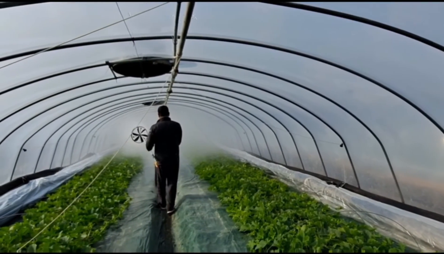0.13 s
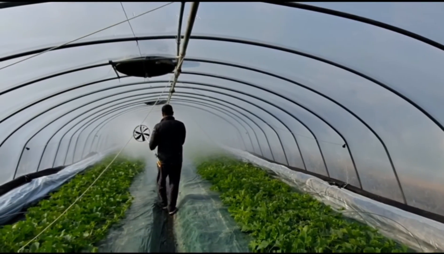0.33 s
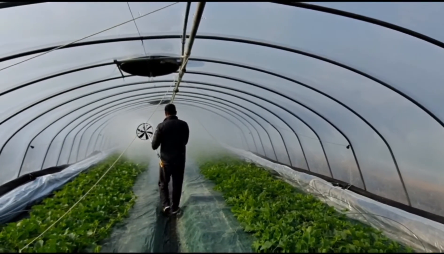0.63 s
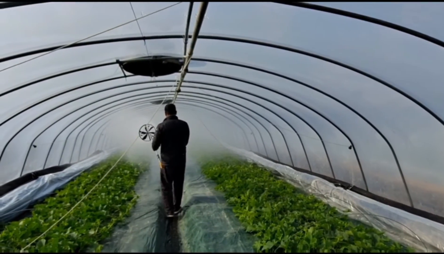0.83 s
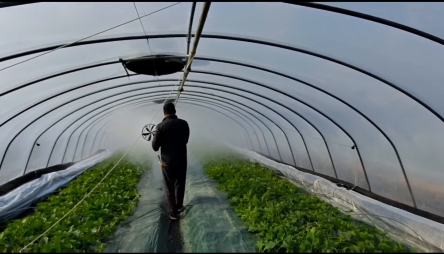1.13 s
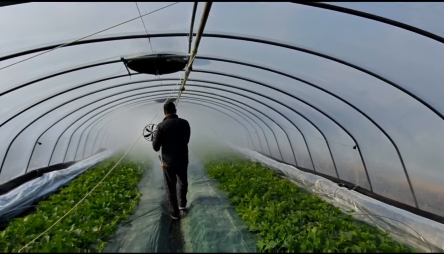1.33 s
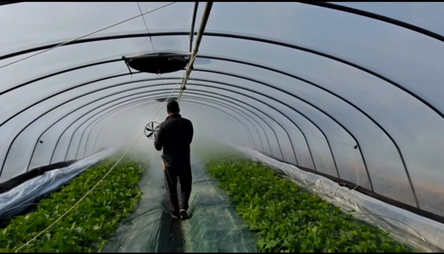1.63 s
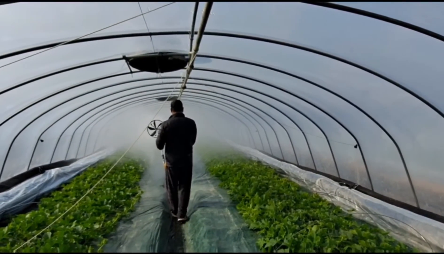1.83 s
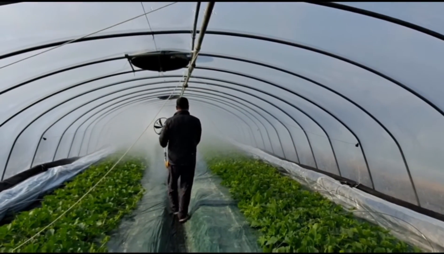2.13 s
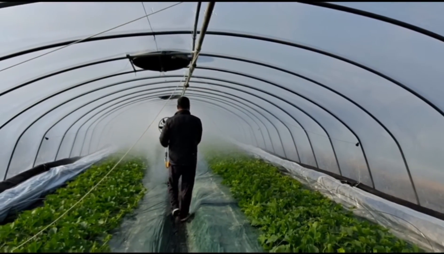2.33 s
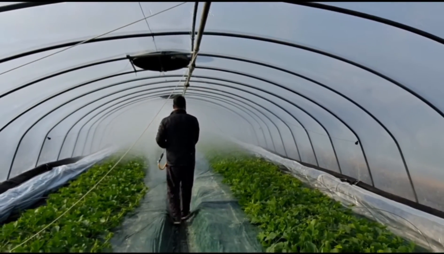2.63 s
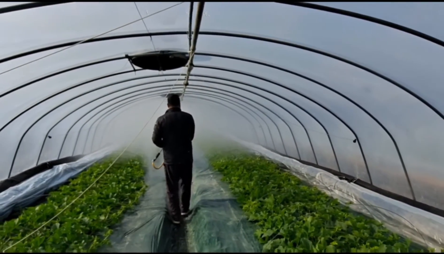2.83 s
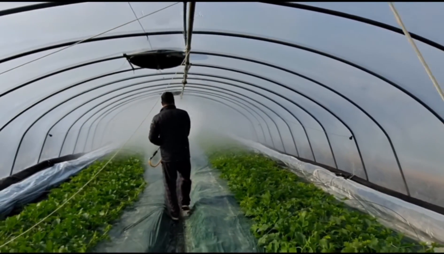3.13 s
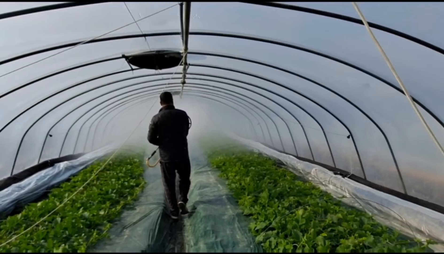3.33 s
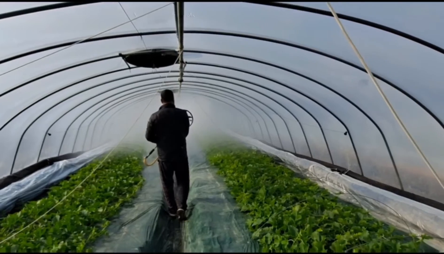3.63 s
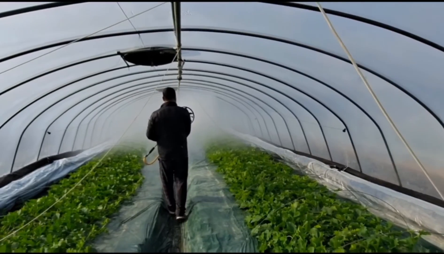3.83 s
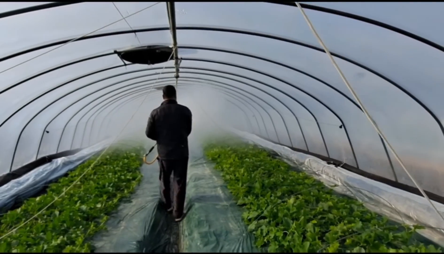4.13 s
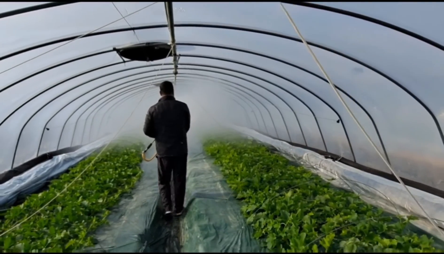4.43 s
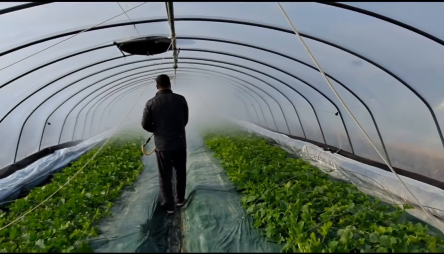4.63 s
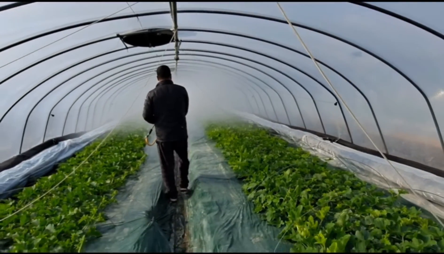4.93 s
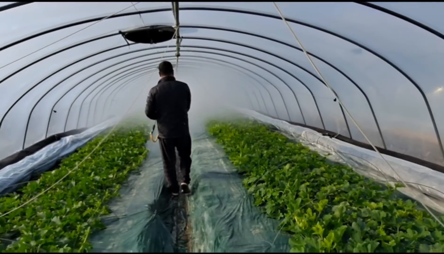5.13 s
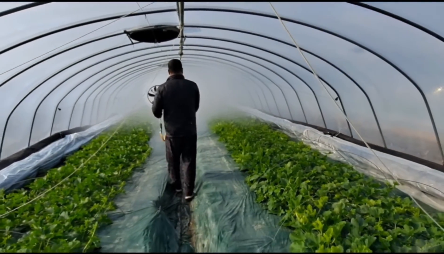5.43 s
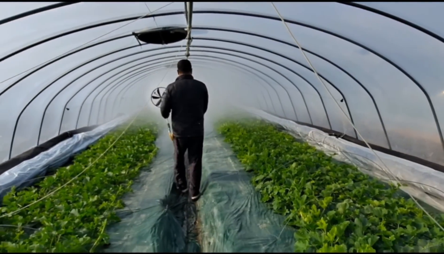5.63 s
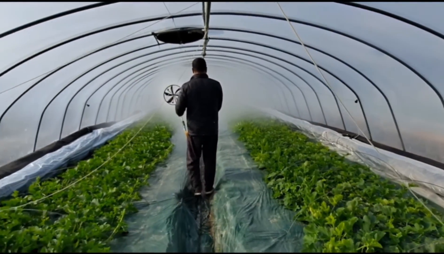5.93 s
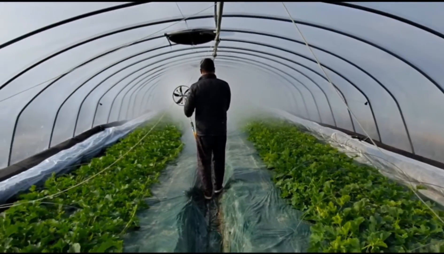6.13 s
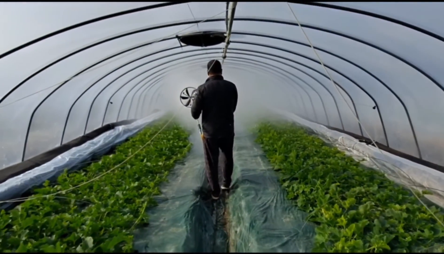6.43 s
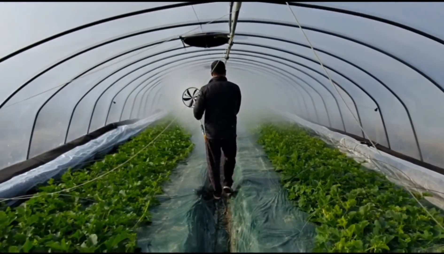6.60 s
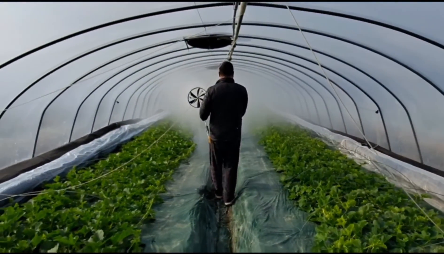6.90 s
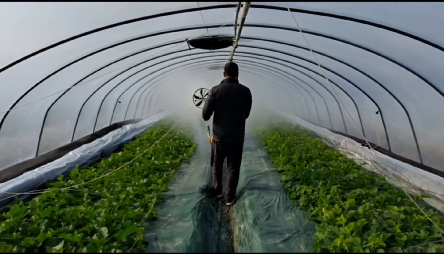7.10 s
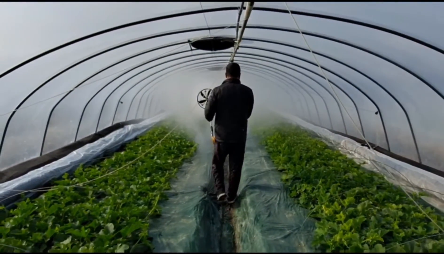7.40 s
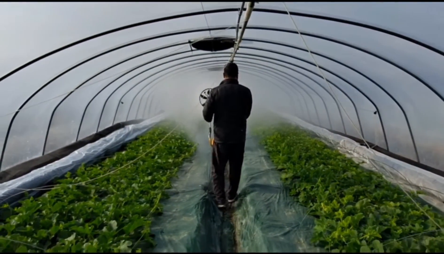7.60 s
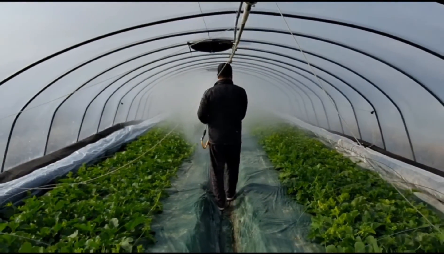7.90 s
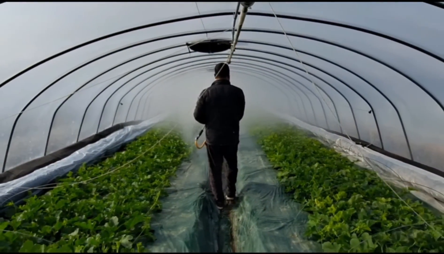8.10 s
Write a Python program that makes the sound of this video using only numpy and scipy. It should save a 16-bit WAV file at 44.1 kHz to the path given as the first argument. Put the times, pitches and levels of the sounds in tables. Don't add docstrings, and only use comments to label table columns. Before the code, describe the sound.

From 0 seconds a misting nozzle is already running, a few metres ahead of a single microphone in a plastic tunnel greenhouse. Its sound is a dense, bright, steady hiss, strongest in the high treble, with no separate drops or splashes. Far below it in level lies a soft, windy fan roar with a breathy, blurred low hum. The hiss wavers only slightly as the nozzle swings, dipping around 2 seconds, while the fan slowly grows nearer. At about 3.8 seconds everything jumps abruptly louder, the hiss most clearly, and stays there. Small dips follow near 4.3 and 7.4 seconds, with slightly brighter moments near 5.6 and at the end. Echoes from ground and film give a faint, shifting hollowness, and brief grainy flickers touch narrow bands. The spray continues to about 8.3 seconds without stopping.

```python
import sys
import numpy as np
from scipy import signal
from scipy.fft import rfft, irfft, next_fast_len
from scipy.io import wavfile

SR = 44100
rng = np.random.default_rng(int(sys.argv[2]) if len(sys.argv) > 2 else 0)


def gain_from_decibels(decibels):
    exponent = np.asarray(decibels, float) / 20
    return 10 ** exponent


def store_wav(level_fs):
    pcm = np.round(np.clip(np.atleast_2d(level_fs), -1, 1) * 32767)
    wavfile.write(sys.argv[1], SR, pcm.T.astype(np.int16))


N = 364266

# f/Hz, level/dB per Hz
JET_SPECTRUM = [(1800, -34), (2600, -18), (3200, -14.5), (3900, -9.7), (5400, -7.2), (6400, -7.3),
                (7600, -3.8), (8700, -4.2), (9700, -7.7), (10600, -5.4), (11900, -1.1), (13000, -1.1),
                (14200, -2.0), (15740, -3.2)]
# level/dB, gain step/dB
HISS_LEVEL = (-29.5, 3.98)


def nozzle_hiss():
    level_db, step_db = HISS_LEVEL
    hiss_db = level_db + step_db * gain_step() + nozzle_aim_db()
    return gain_from_decibels(hiss_db) * turbulence(JET_SPECTRUM, shared_db=0.26, near_db=0.39, own_db=0.23, rate=12.4)


# t/s, hiss level/dB about the mean
NOZZLE_AIM = [(0, 0), (.3, -.4), (.85, .5), (1.5, 0.06), (1.9, -.5), (2.3, -.5), (2.7, 0), (3.8, 0.3),
              (3.9, -0.4), (4.3, -0.54), (4.8, .2), (5.6, .5), (6.4, 0.17), (6.9, 0), (7.4, -.5), (7.8, 0),
              (8.26, .5)]


def nozzle_aim_db():
    aim_db, = in_time(NOZZLE_AIM)
    return aim_db


# f/Hz, level/dB per Hz
UPPER_ROAR = [(900, -27), (1250, -7), (1600, -4), (2200, -3.5), (2800, -3), (3400, -4), (4500, -31)]
LOWER_ROAR = [(380, -27), (520, -8.5), (700, -0.5), (810, -3.5), (950, -2), (1200, -4.5), (1700, -42)]
BODY_ROAR = [(110, -33), (170, -5), (240, 0.5), (265, -3), (330, 0.5), (450, -4.5), (700, -23.5)]


def fan_roar(upper_db, lower_db, body_db):
    roar = gain_from_decibels(upper_db) * turbulence(UPPER_ROAR, shared_db=0.3, near_db=0.8, own_db=0.5, rate=6.7)
    roar += gain_from_decibels(lower_db) * turbulence(LOWER_ROAR, shared_db=0.0, near_db=0.6, own_db=0.8, rate=4.6)
    roar += gain_from_decibels(body_db) * turbulence(BODY_ROAR, shared_db=0.15, near_db=0.44, own_db=1.8, rate=4.8)
    return roar


# f/Hz, level/dB per Hz
RUMBLE_SPECTRUM = [(10, -32), (28, -18), (40, -7.5), (62, 2), (85, -1.5), (130, 2), (170, -3.5), (260, -36)]


def fan_rumble(rumble_db):
    hum_db = -5.5
    rumble = turbulence(RUMBLE_SPECTRUM, shared_db=2.1, near_db=1.0, own_db=0.1, rate=5.8)
    return gain_from_decibels(rumble_db) * (rumble + gain_from_decibels(hum_db) * blade_hum())


def blade_hum():
    blade_hz, width_hz = 131.2, 26
    poles = resonance(blade_hz, width_hz)[0]
    once = signal.lfilter([1, 0, -1], poles, rng.standard_normal(N))
    return rms_one(signal.lfilter([1], poles, once))


# level/dB, gain step/dB, share of nearness, share of aim
FAN_LEVELS = [
    (-50.5, 4, 0.54, 1.5),
    (-58, 2.1, .8, -2.1),
    (-59.5, 2, 1.5, 0.5),
    (-61, 1.6, 0.86, -0.3),
]


def fan_layer_levels():
    stepped, near_db, aim_db = gain_step(), fan_nearness_db(), nozzle_aim_db()
    return [level_db + step_db * stepped + near_share * near_db + aim_share * aim_db
            for level_db, step_db, near_share, aim_share in FAN_LEVELS]


# t/s, fan level/dB
NEARNESS = [
    (0, -3.5),
    (1.5, -1.6),
    (3.0, -0.3),
    (3.8, 1),
    (5.5, .8),
    (8.26, 2),
]


def fan_nearness_db():
    near_db, = in_time(NEARNESS)
    return near_db


# t/s, shift (about -1..2)
SWING = [(0, 2), (1.1, .8), (1.85, 0.28), (2.0, -0.8), (3.2, -0.28), (4.8, -1.1), (5.2, 0.67), (5.7, 0.51),
         (6.0, -.5), (6.35, -.9), (6.55, .9), (7.15, 0.98), (7.3, -0.65), (8.26, -0.26)]
NOTCH_REST = [
    (525, -7),
    (1300, 40),
    (1880, 105.0),
]


def notch_hz():
    swing, = in_time(SWING)
    return [rest_hz + slide * swing for rest_hz, slide in NOTCH_REST]


# width/Hz, level/dB at the bottom
NOTCH_SHAPE = [
    (149, -1),
    (223, -6),
    (189, -7),
]


def echo_notches(x):
    for centre_hz, (width_hz, depth_db) in zip(notch_hz(), NOTCH_SHAPE):
        band, state = np.zeros(N), np.zeros(2)
        for i in range(0, N, 1024):
            poles, r = resonance(centre_hz[i], width_hz)
            zeros = [(1 - r * r) / 2, 0, (r * r - 1) / 2]
            band[i:i + 1024], state = signal.lfilter(zeros, poles, x[i:i + 1024], zi=state)
        x = x - (1 - gain_from_decibels(depth_db)) * band
    return x


def gain_step():
    step_s, rise_s = 3.845, .002
    return np.clip((np.arange(N) / SR - step_s) / rise_s + .5, 0, 1)


def turbulence(spectrum, shared_db, near_db, own_db, rate):
    size = next_fast_len(N)
    hz = np.maximum(np.arange(size // 2 + 1) * SR / size, 1)
    points = np.array(spectrum)
    shape_db = np.interp(np.log(hz), np.log(points[:, 0]), points[:, 1], left=-90, right=-90)
    noise = rfft(rng.standard_normal(size)) * gain_from_decibels(shape_db)
    place = 2 * np.log2(hz)
    first = int(place[1:][shape_db[1:] > -50].min())
    last = int(place[shape_db > shape_db[-1]].max(initial=0)) + 1
    out, shared, before = np.zeros(N), drift(rate), drift(rate)
    for k in range(first, last + 1):
        after = drift(rate)
        overlap = np.clip(1 - abs(place - k), 0, 1)
        band = irfft(noise * overlap, size)[:N]
        swell_db = shared_db * shared + near_db * (before + after) + own_db * drift(rate / 5)
        out += band * gain_from_decibels(swell_db)
        before = after
    return rms_one(out)


def drift(rate):
    r = np.exp(-80 * np.pi * rate / SR)
    sparse = rng.standard_normal(N // 40 + 2002)
    slow = signal.lfilter([1], [1, -2 * r, r * r], sparse)[2000:]
    return np.interp(np.arange(N) / 40, np.arange(len(slow)), rms_one(slow))


def resonance(centre_hz, width_hz):
    r = np.exp(-np.pi * width_hz / SR)
    return [1, -2 * r * np.cos(2 * np.pi * centre_hz / SR), r * r], r


def rms_one(x):
    return x / np.sqrt(np.mean(x ** 2) + 1e-20)


def in_time(rows):
    s, *columns = np.transpose(rows)
    return [np.interp(np.arange(N) / SR, s, c) for c in columns]


def scene():
    upper_db, lower_db, body_db, rumble_db = fan_layer_levels()
    mix = nozzle_hiss() + fan_roar(upper_db, lower_db, body_db) + fan_rumble(rumble_db)
    return np.tile(echo_notches(mix), (2, 1))


FRAME = 2048


def frame_at(s):
    return slice(round(s * SR) - FRAME // 2, round(s * SR) + FRAME // 2)


def frame_band(x, low, high):
    hz = np.arange(FRAME // 2 + 1) * SR / FRAME
    return irfft(rfft(x) * ((hz > low) & (hz < high)))


def frame_fade():
    return np.sin(np.pi / 2 * np.sin(np.pi * (np.arange(FRAME) + .5) / FRAME) ** 2)


# t/s, length/frames, which notch (0..2)
HOLES = [(0.419, 1, 2), (1.046, 2, 2), (1.859, 1, 2), (1.998, 1, 2), (2.323, 1, 2), (2.486, 1, 2),
         (2.532, 1, 2), (2.718, 2, 1), (3.136, 2, 2), (3.925, 1, 1), (3.925, 1, 2), (4.018, 1, 2),
         (4.065, 1, 2), (4.367, 2, 2), (4.808, 1, 2), (5.226, 1, 2), (5.411, 4, 2), (5.62, 1, 1),
         (5.69, 1, 2), (5.969, 2, 2), (6.34, 1, 2), (6.549, 1, 2), (6.619, 1, 1), (7.014, 1, 2),
         (7.153, 1, 2), (7.315, 1, 2), (7.548, 1, 2), (7.664, 3, 2), (7.942, 1, 1)]


def drop_bands(x):
    hole_width_hz = 250
    stray_holes, stray_spread_hz, stray_width_hz = 45, 90, 120
    first_frame_s, hop_s = .0243, FRAME / 2 / SR
    out, fade, centres = x.copy(), frame_fade(), notch_hz()
    drops = []
    for s, frames, notch in HOLES:
        centre_hz = centres[notch][round(s * SR)]
        drops += [(s + k * hop_s, centre_hz, hole_width_hz) for k in range(frames)]
    for when, which, off in rng.random((stray_holes, 3)):
        s = first_frame_s + hop_s * int(when * (N / SR / hop_s - 3))
        centre_hz = centres[int(3 * which)][round(s * SR)]
        drops.append((s, centre_hz + stray_spread_hz * (2 * off - 1), stray_width_hz))
    for s, hz, width in drops:
        span = frame_at(s)
        out[:, span] -= fade * frame_band(fade * out[:, span], hz - width / 2, hz + width / 2)
    return out


# t/s, lowest f/kHz, highest f/kHz, number of bands between them
SWAPS = [(0.396, 11, 15.2, 2), (0.837, 13.7, 15.2, 1), (1.185, 6.8, 14.4, 3), (1.301, 7.6, 13.8, 3),
         (1.394, 9.6, 11.8, 1), (1.65, 4.1, 5.8, 1), (1.743, 4.1, 15.7, 3), (1.789, 5.1, 7, 1),
         (2.695, 4.7, 6.3, 1), (3.693, 5.6, 12.4, 3), (4.041, 7.5, 9, 1), (4.25, 4.7, 5.6, 1),
         (4.483, 11.6, 13.8, 1), (4.761, 11, 12.4, 1), (5.202, 4.2, 5.2, 1), (5.342, 5.1, 9, 1),
         (5.388, 4.2, 11.8, 3), (5.667, 5.6, 6.9, 1), (5.69, 4.6, 15.2, 3), (5.922, 7.5, 8.9, 1),
         (6.503, 5.1, 15.7, 2), (6.665, 13, 14.5, 1), (6.805, 4.1, 11.8, 2), (7.153, 6.2, 14.5, 2),
         (7.246, 11.7, 13.8, 1), (7.594, 9.6, 11.8, 1), (7.78, 4.1, 7.7, 2), (7.826, 11.7, 13.1, 1)]


def swap_for_noise(x):
    swap_db, several_width_hz = -0.1, 1500
    out, fade = x.copy(), frame_fade()
    for s, lowest, highest, count in SWAPS:
        span = frame_at(s)
        width = several_width_hz if count > 1 else 1000 * (highest - lowest)
        for low in np.linspace(1000 * lowest, 1000 * highest - width, count):
            band = frame_band(x[:, span], low, low + width)
            noise = frame_band(rng.standard_normal((2, FRAME)), low, low + width)
            fresh = rms_one(noise) * np.sqrt(np.mean(band ** 2))
            removed = (1 - np.sqrt(1 - fade ** 2)) * band
            out[:, span] += gain_from_decibels(swap_db) * fade * fresh - removed
    return out


def top_cut(x):
    return signal.sosfilt(signal.butter(12, 17080, fs=SR, output="sos"), x)


def record(dry):
    mix = swap_for_noise(drop_bands(dry))
    return top_cut(mix)


dry = scene()
out = record(dry)
store_wav(out)
```